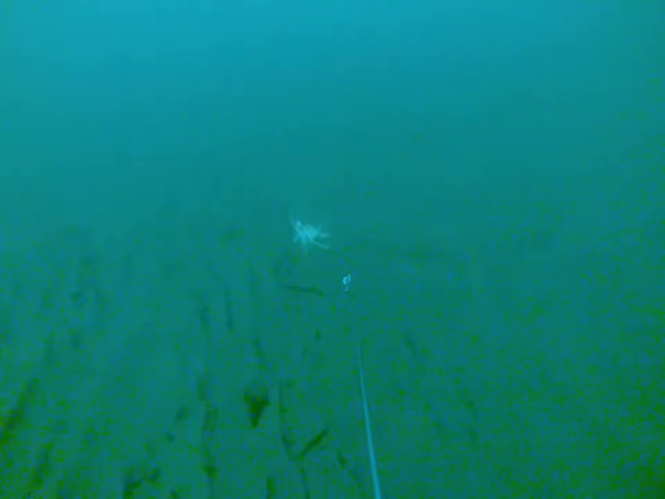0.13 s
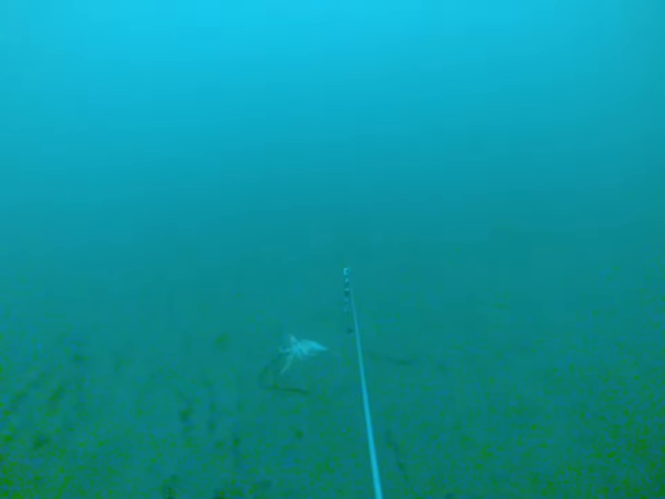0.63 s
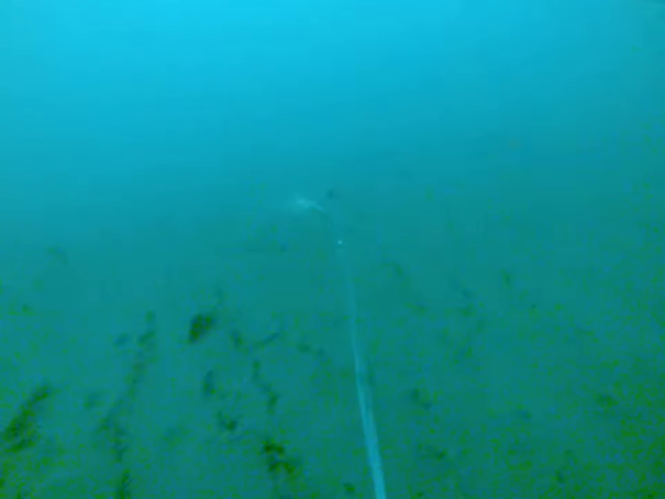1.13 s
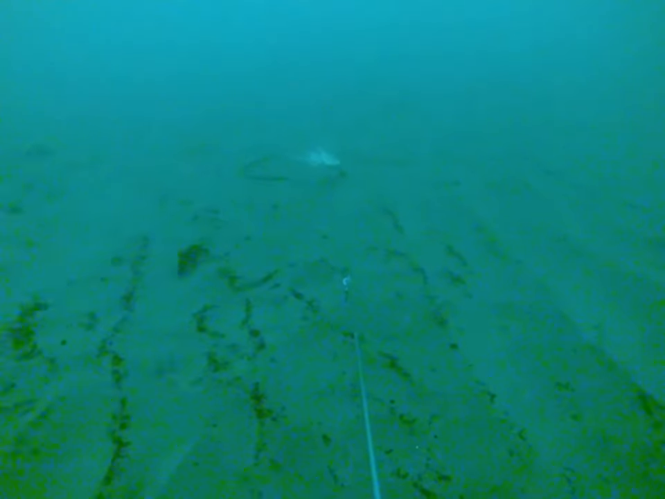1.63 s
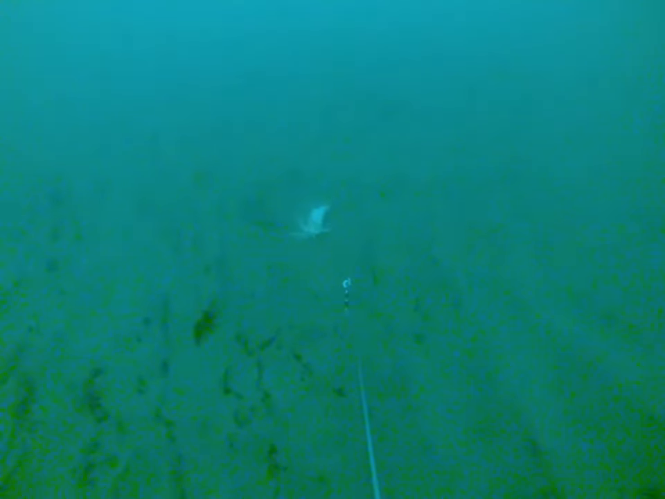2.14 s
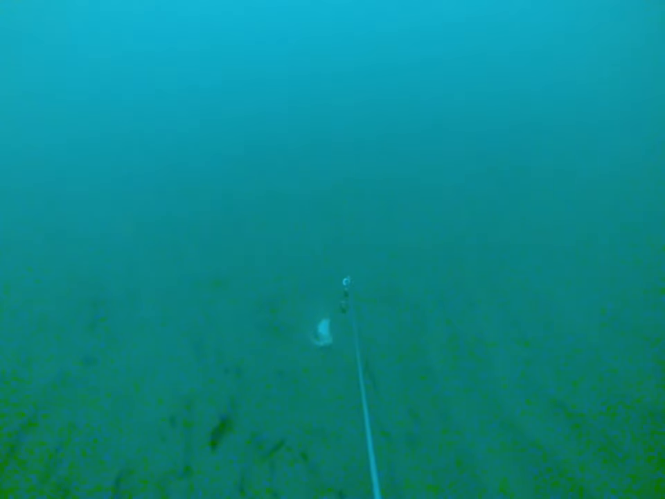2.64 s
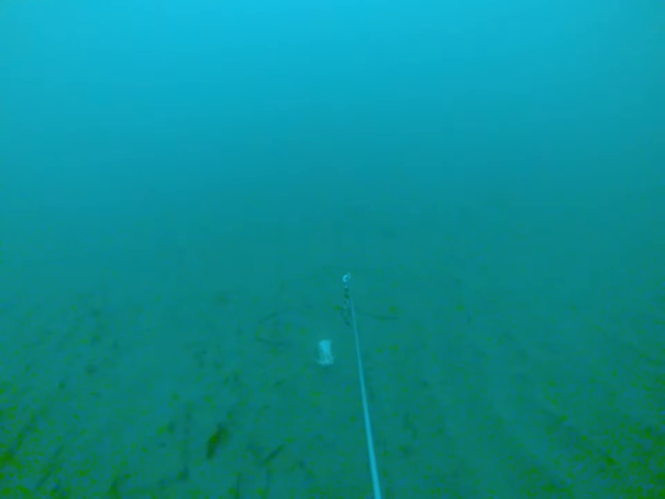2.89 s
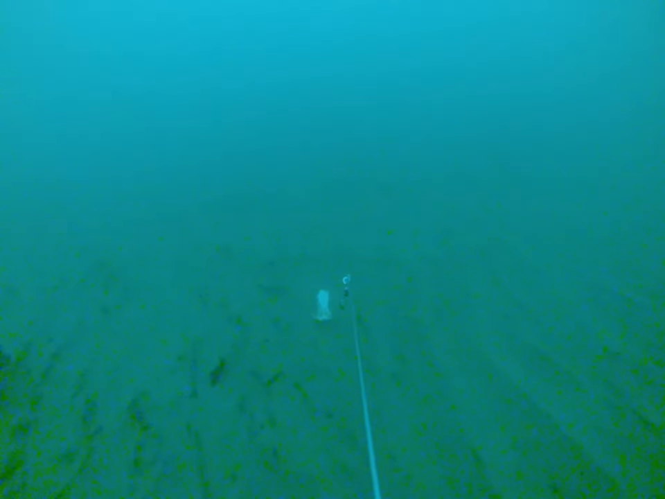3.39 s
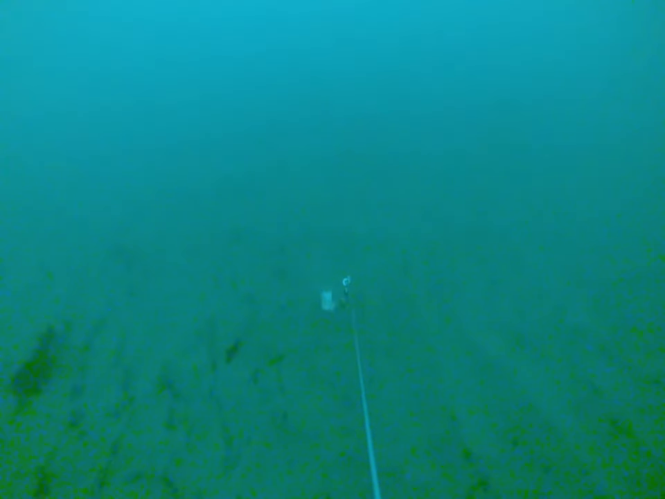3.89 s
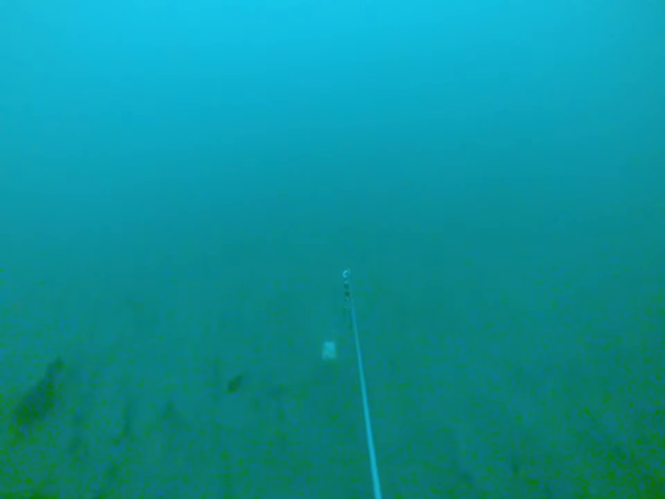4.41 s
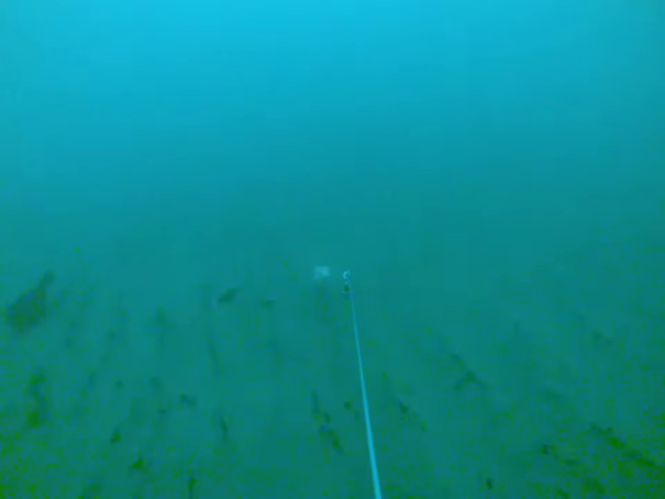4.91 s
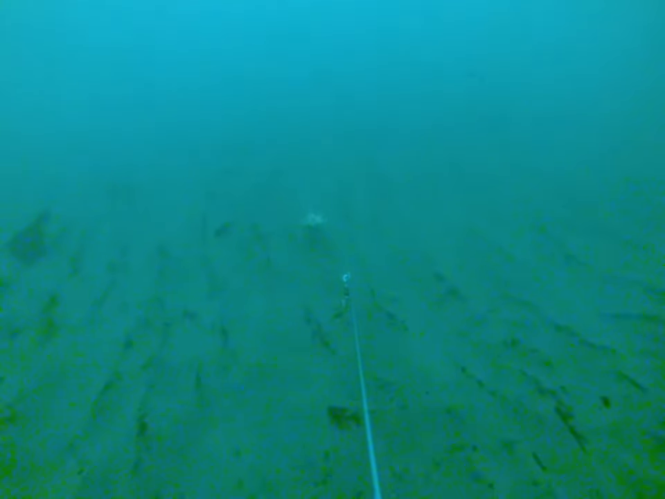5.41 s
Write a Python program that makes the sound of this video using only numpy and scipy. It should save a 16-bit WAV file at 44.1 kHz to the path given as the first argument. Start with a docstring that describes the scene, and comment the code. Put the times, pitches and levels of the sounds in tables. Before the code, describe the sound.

Close, boxy underwater sound of a fishing rig above a sandy bottom. Sharp plastic clicks open it, then scraping and rattling swell into one loud cluster of cracks with a low boom around 0.9 seconds and short ringing metal. The rest is much quieter: scattered taps and scuffs, a weak wavering hum from the line, muffled rumble, constant faint hiss and a delicate timer-like tick.

```python
"""A sealed camera housing hangs on a fishing line under water and hears through its own plastic shell.
From the start broadband noise and low turbulent rumble underlie rubbing, which excites rig and shell
resonances, then line notes (wavering sines), knocks (impulses into damped modes) and faint timed ticks.
Near 0.9 s a strong low note, a surge of flow and the hardest knocks come together; from 1.07 s four blows
leave metal ringing. Afterwards lighter knocks, rubbing and weaker line notes continue to the end."""
import sys
import numpy as np
from scipy import signal
from scipy.fft import rfft, irfft
from scipy.io import wavfile
from scipy.ndimage import uniform_filter1d, minimum_filter1d

SR = 44100
rng = np.random.default_rng(int(sys.argv[2]) if len(sys.argv) > 2 else 0)


def pcm_store(signal):
    """Save signal as 16-bit PCM."""
    levels = np.round(np.clip(np.atleast_2d(signal), -1, 1) * 32767)
    wavfile.write(sys.argv[1], SR, levels.astype(np.int16).T)


def ratio(d):
    """dB to gain"""
    e = np.asarray(d, float) / 20
    return 10 ** e


N = 243873

# Water through the shell and recorder hiss, relative density: (frequency [Hz], density [dB per Hz])
FLOOR_SPECTRUM = [(88, -25), (150, 2.5), (193, -12), (264, -12.5), (866, -22), (1140, -17), (1470, -7.5),
                  (2080, -22.5), (2630, -25), (3070, -19.5), (4280, -30), (4630, -27.5), (5850, -32.5),
                  (13000, -41), (15800, -58)]
# Flow past the housing, before a common trim: (time [s], level [dB])
FLOW_LEVEL = [(0.0, -49.5), (0.15, -39), (0.21, -48), (0.69, -48.5), (1.0, -22.5), (1.12, -43.5),
              (1.35, -34.5), (1.42, -46), (1.49, -43.5), (2.28, -44.5), (2.48, -47), (2.68, -46.5),
              (3.97, -57.5), (4.02, -55.5), (5.53, -53.5)]
# Relative density of the flow rumble: (frequency [Hz], density [dB per Hz])
FLOW_SPECTRUM = [(15, -8.5), (24, -0.5), (31, 4.5), (44, 4.5), (62, -6), (100, -13.5), (200, -25.5),
                 (400, -34), (800, -69)]
# Bouts of tackle rattling and rubbing: (start [s], length [s], shell drive [dB], rig drive [dB])
RUB_BOUTS = [(0, 0.0062, -69, -43.5), (0.08, 0.02, -34.5, -59.5), (0.098, 0.021, -35.5, -35),
             (0.652, 0.078, -26.5, -46), (0.764, 0.082, -27, -50), (0.863, 0.018, -26.5, -24),
             (.92, .03, -25.5, -35), (.985, .04, -21, -40.5), (1.05, .01, -30, -37), (1.13, .035, -37, -41),
             (1.245, 0.077, -35, -42), (1.457, 0.088, -50, -46.5), (1.647, 0.053, -53.5, -54.5),
             (1.845, 0.028, -56, -53), (1.957, .04, -53, -61), (2.1, 0.15, -61.5, -52.5),
             (2.241, 0.093, -33, -43), (2.536, .06, -57.5, -64.5), (2.659, .07, -64.5, -51),
             (2.855, .03, -64, -61.5), (3.18, 0.012, -49.5, -58), (3.268, 0.082, -49.5, -43),
             (3.49, 0.18, -67.5, -60), (3.848, 0.19, -53.5, -52.5), (4.133, 0.037, -50, -61),
             (4.207, 0.029, -56, -71), (4.4, 0.061, -56, -59), (4.525, 0.069, -60.5, -61),
             (5.151, .05, -70.5, -64.5), (5.355, .04, -73.5, -56.5), (5.461, 0.052, -64, -59.5)]
# Slow modes of the rig, mean levels: (frequency [Hz], bandwidth [Hz], level [dB])
RIG_MODES = [(133, 6.6, -0.5), (166.2, 6.3, -2.5), (207.2, 32, -4.5), (273.9, 2.1, -6), (369.5, 25, -8),
             (470, 29, -26), (708, 2.5, -16.5), (665.6, 6.7, -21)]
# Shell modes, undamped by contact: (frequency [Hz], relative level [dB], t60 [s])
SHELL_MODES = [(684, -18.5, 0.17), (695.7, -20.5, 0.62), (980.6, -9, 0.12), (1144, -10, 0.19),
               (1284, -5, 0.19), (1375.4, -4, 0.4), (1473, -1.5, 0.23), (1643, -1.5, 0.16),
               (1806, -2.5, 0.19), (1955, 0, .08), (2154, -19, 0.6), (2379, 0.5, 0.051), (2603, -12, 0.22),
               (2660, -4, 0.048), (2928, -2.5, 0.16), (3103, -0.5, 0.086), (3320, -3, 0.047),
               (3296, -5.5, 0.078), (3432.5, 1, 0.11), (3980, -30, 0.027), (3870, -19.5, 0.14),
               (4130, -14, 0.048), (4537, -6, 0.11), (4646, -3, 0.058), (5150, -18.5, 0.11),
               (6040, -22, 0.081), (6350, -26, 0.098), (6490, -26.5, 0.1), (7640, -33.5, 0.04),
               (8400, -29.5, .04), (8630, -39, 0.0061)]
LOW_UNDER_HZ, HIGH_OVER_HZ = 2060, 4060   # the low and high groups of shell modes
# Notes of the line: (loudest time [s], mean frequency [Hz], rms level at the top [dB], swell [s], fade [s])
LINE_NOTES = [(.08, 133.6, -44, 0.052, 0.13), (.87, 54.5, -14, 0.31, .1), (.9, 162, -40, 0.054, .5),
              (.96, 56.4, -31, .1, .4), (1.06, 167.7, -27.5, .2, 0.071), (1.27, 164.3, -38, 0.12, 0.23),
              (1.29, 86.9, -30.5, .25, 0.2), (1.321, 56.4, -27, 0.19, 0.43), (1.55, 156.3, -50, .2, 0.14),
              (1.56, 54.54, -35, 0.34, 0.38), (2.3, 129.7, -34.5, 0.26, 0.26),
              (3.301, 129.7, -52.5, 0.64, 0.55), (3.65, 124.9, -55.5, .4, .5),
              (4.78, 128.6, -51.5, 0.537, 0.7), (5.1, 122.6, -55.5, 0.31, 1)]
# Tackle knocks, before common trims and scatter:
# (time [s], blow level [dB], low modes re blow [dB], high modes re blow [dB], lasting ring re blow [dB])
SHELL_KNOCKS = [(0.0618, -31, -24, -21.5, 12), (0.0776, -16.5, -28, -7.5, 0.5),
                (0.0867, -10, -29, -15.5, -8.5), (0.1276, -36.5, -38, -16, 3.5),
                (0.174, -30.5, -12, -22, -8), (0.2328, -42, -2.5, -20, -11), (0.3447, -35, -6.5, -15, -17),
                (0.564, -40.5, 0.5, -20, -16), (0.6853, -26.5, 3, -11, -0.5), (0.7135, -16.5, -10, -23, -5),
                (0.8355, -20, 0, -2, -13.5), (0.8698, -12.5, -3, -7.5, -37), (0.8926, 11, -14, -23.5, -41),
                (0.8998, 6.5, -12.5, -9.5, -49), (0.9231, -9, -14, -19, -28),
                (0.9381, -6.5, -9.5, -11.5, -11.5), (1.0156, 2.5, -15, -8, -23),
                (1.0445, -8, 2.5, -14, -20), (1.0702, 3.5, -36, -14.5, -40), (1.1051, -1, -42, -9.5, -32),
                (1.1261, -9.5, -31, -17, -17), (1.1424, -25, -26, -13.5, -3),
                (1.2061, -7.5, -14.5, -16, -1), (1.257, -26.5, -1, -9, -22), (1.294, -18, -17, -26, 0),
                (1.3129, -21, -1, -19, -14), (1.3674, -30, -8.5, -18.5, 0.5),
                (1.3923, -32, -2.5, -18, -10.5), (1.433, -35, -7, -16, -5), (1.4528, -28, -4.5, -19, -2.5),
                (1.5364, -31, 1, -15, -11), (1.6004, -37, -3, -18, -1.5), (1.6288, -36.5, -5, -16, -5),
                (1.705, -33, -3, -19.5, -13.5), (1.7505, -34.5, -7.5, -27, -3.5),
                (1.785, -33, -8, -21, -3.5), (1.928, -27, -12.5, -21.5, -7),
                (2.0158, -36, -7.5, -18.5, -8.5), (2.0893, -28, 9, -42, -21.5),
                (2.1298, -30.5, -6, -23, -6), (2.154, -32.5, -7, -22, -8), (2.1804, -22.5, -6.5, -15, -12),
                (2.196, -22.5, -12, -30, -24), (2.3059, -29, -6.5, -22, -0.5), (2.3292, -20, -11, -13, -7),
                (2.378, -38, 6, -19, -15), (2.4155, -22.5, -9, -23, -21), (2.4913, -40, -10.5, -14, -12.5),
                (2.6503, -29.5, -7, -28.5, -10), (2.6741, -37.5, -2, -23, -8.5),
                (2.7053, -35, -8, -17.5, -15), (2.7455, -38.5, 0.5, -19.5, -17),
                (3.1118, -37.5, -1.5, -27, -15.5), (3.2073, -32.5, 0, -15, -16.5),
                (3.2311, -23.5, -11, -21, -4), (3.2787, -35.5, -8, -36, 6.5),
                (3.3044, -23.5, -5, -22, -12.5), (3.3363, -47, 11, -14, -4),
                (3.3575, -30.5, -18, -20, -24.5), (3.4896, -35, -3.5, -34, -11.5),
                (3.8356, -45, -13.5, -23, -7), (3.8677, -22.5, -18, -27, -18),
                (3.9075, -37.5, -16, -22.5, -24), (3.9634, -38.5, -9.5, -23, -19.5),
                (4.0062, -29, -5.5, -26, -14), (4.0587, -50, -5, -23, -17.5), (4.3809, -34, -7, -20.5, -21),
                (4.4054, -36.5, -6.5, -19, -16.5), (4.586, -44.5, 1.5, -20.5, -12.5),
                (4.7576, -40.5, -5, -22, -13), (4.7715, -35, -7, -14.5, -19), (4.8223, -34, -4, -21, -25),
                (5.226, -29, -4, -15.5, -17), (5.3622, -31, -8, -30, -6), (5.449, -39, -1.5, -18, -24),
                (5.4987, -37, -2, -32, -18)]
# Modes of the electronic tick, before scatter: (frequency [Hz], level re tick [dB], t60 [s])
TICK_MODES = [(1573, -1.5, .02), (3230, -1, 0.007), (4440, -11.5, 0.0098)]
# Indices of the ticks that come one step late
LATE_TICKS = [7, 8, 11, 15, 20]
# Hard blows on a metal part of the tackle, before scatter: (time [s], level [dB])
METAL_BLOWS = [(1.0702, -21), (1.1051, -20), (1.1261, -23), (1.2063, -25)]
# Freely ringing metal modes: (frequency [Hz], level re blow [dB], t60 [s])
METAL_MODES = [(1367, 0, .45), (1745, -7, .25), (2155, -3, .4), (2601, -3, .28), (3021, -1, .25),
               (3480, -4, .16)]


def rms_one(x):
    """Normalisation: scale to rms 1."""
    return x / np.sqrt(np.mean(x ** 2) + 1e-20)


def in_time(rows):
    """Linear interpolation: columns of a time table at every sample."""
    s, *columns = np.transpose(rows)
    return [np.interp(np.arange(N) / SR, s, c) for c in columns]


def drift(rate_hz):
    """Low-pass random process: white noise through two equal poles, rms 1."""
    step_rate = 200   # Hz
    steps = rng.standard_normal(int(N / SR * step_rate) + 400)
    pole = np.exp(-2 * np.pi * rate_hz / step_rate)
    settled = signal.lfilter([1], [1, -2 * pole, pole * pole], steps)[300:]
    slow = rms_one(settled)
    return np.interp(np.arange(N) / SR * step_rate, np.arange(len(slow)), slow)


def coloured_noise(points):
    """Spectral shaping: white noise weighted along log frequency, rms 1."""
    hz, db = np.transpose(points)
    bins_hz = np.arange(N // 2 + 1) * SR / N + 1   # the 1 keeps the logarithm finite
    gain = ratio(np.interp(np.log(bins_hz), np.log(hz), db))
    return rms_one(irfft(rfft(rng.standard_normal(N)) * gain, N))


def ring(force, hz, t60):
    """Damped resonator: a unit click starts a decaying sine of initial height 1."""
    r, w = ratio(-60 / (t60 * SR)), 2 * np.pi * hz / SR
    return signal.lfilter([0, np.sin(w)], [1, -2 * r * np.cos(w), r * r], force + 1e-18)


def band_pass(x, order, low_hz, high_hz):
    """Band limitation: a Butterworth filter passes the range between two corners."""
    return signal.sosfilt(signal.butter(order, [low_hz, high_hz], "band", fs=SR, output="sos"), x)


def muffled(x):
    """Wall transmission: the stiff thick wall passes little outside the range of its modes."""
    return band_pass(x, 4, 620.0, 9150.0)


def snap(contact):
    """Direct contact radiation: the bare contact also reaches the microphone, thin and bright."""
    return band_pass(contact, 2, 7200.0, 12400.0)


def thud(contact):
    """Bulk compliance: the whole housing gives way a little, a short dull push."""
    return band_pass(contact, 2, 260.0, 602.0)


def struck(s, db, modes, spread_db):
    """Modal superposition: each blow excites every mode with a random strength of its own."""
    at = np.round(s * SR).astype(int)
    chance = rng.standard_normal((len(s), len(modes)))
    out = np.zeros(N)
    for k, (hz, level_db, t60) in enumerate(modes):
        strength = ratio(db + level_db + spread_db * chance[:, k])
        out += ring(np.bincount(at, strength, N), hz, t60)
    return out


def background():
    """Stationary broadband noise: water through the shell and recorder hiss, with a slow level drift."""
    return ratio(-59.5 + 1.0 * drift(1.0)) * coloured_noise(FLOOR_SPECTRUM)


def flow():
    """Turbulent pressure fluctuation: lumpy low rumble of eddies on the housing."""
    level_db, = in_time(FLOW_LEVEL)
    trim_db, lump_db = 2.0, 2.0
    return ratio(level_db + trim_db + lump_db * drift(3.3)) * coloured_noise(FLOW_SPECTRUM)


def bouts(level_db, rise_db_per_s, fall_db_per_s, rest_db):
    """Exponential envelopes: each bout rises, holds and falls; gains add to a resting gain, given out in dB."""
    t = np.arange(0, N + 40, 40) / SR   # every 40 samples is enough
    gain = ratio(rest_db)
    for (start, length, *_), db in zip(RUB_BOUTS, level_db):
        before = np.maximum(start - t, 0)
        after = np.maximum(t - start - length, 0)
        gain = gain + ratio(db - rise_db_per_s * before - fall_db_per_s * after)
    return np.interp(np.arange(N) / SR, t, 20 * np.log10(gain))


def rig():
    """Narrow-band random vibration: rubbing shakes a few low modes, each swelling in its own time."""
    rig_db = bouts(np.transpose(RUB_BOUTS)[3], rise_db_per_s=251, fall_db_per_s=137, rest_db=-76)
    out = 0
    for hz, width_hz, level_db in RIG_MODES:
        t60 = np.log(1000) / (np.pi * width_hz)   # decay time from bandwidth
        shaken = ring(rng.standard_normal(N), hz, t60)
        out = out + rms_one(shaken) * ratio(level_db + 2.5 * drift(1.2))
    return ratio(rig_db) * rms_one(out)


def rattle():
    """Random impulse excitation: dense tiny contacts ring the shell, whose modes the touch damps."""
    shell_db = bouts(np.transpose(RUB_BOUTS)[2], rise_db_per_s=294.5, fall_db_per_s=396.5, rest_db=-72)
    densest_per_s, damping = 1200.0, 0.3   # damping multiplies t60
    uneven_db, clump_db, low_db, snap_db = 4.5, 2.0, -4.0, -9.0
    crowd, brighten, snap_growth = 0.3, 0.32, 1.7   # exponents
    below_max_db = shell_db - shell_db.max()

    # light rattling breaks up into separate ticks
    crowding = ratio(crowd * below_max_db)
    sizes = ratio(uneven_db * np.minimum(rng.exponential(1, N), 4)) * rng.choice([-1, 1], N)
    happens = rng.random(N) < densest_per_s * crowding / SR
    touches = sizes * happens / np.sqrt(crowding)
    # three places of contact favour different modes
    place = rng.integers(0, 3, N)
    favour = ratio(0.22 * rng.standard_normal((len(SHELL_MODES), 3)))   # spread in dB

    # the middle modes together set the level
    force = touches * ratio(clump_db * drift(40.0))
    middle = sum(ring(force, hz, damping * t60) * ratio(db) for hz, db, t60 in SHELL_MODES[4:20])
    force = force * ratio(shell_db) / np.sqrt(np.mean(middle ** 2))

    # harder rattling shifts from the low to the high modes
    hard = ratio(brighten * below_max_db)
    # the tackle shifts about on the shell
    shifts = [ratio(2.26 * drift(7.9)) for _ in range(10)]
    out = 0
    for k, (hz, db, t60) in enumerate(SHELL_MODES):
        if hz > HIGH_OVER_HZ:
            tilt = hard
        elif hz < LOW_UNDER_HZ:
            tilt = ratio(low_db) / np.sqrt(hard)
        else:
            tilt = 1
        drive = force * favour[k][place] * shifts[k % len(shifts)] * tilt
        out = out + ring(drive, hz, damping * t60) * ratio(db) * (-1) ** k   # alternate polarity
    return muffled(out) + snap(force * hard ** snap_growth * ratio(snap_db))


def strum(top_s, hz, db, swell_s, fade_s):
    """Transverse string vibration: the taut line swings as a near sine that wavers, swells and fades."""
    span_db = 30        # fall at one swell time before the top or one fade time after it
    swell_power = 1.2   # above 1 the swell rounds off towards its top
    waver = 0.0065      # rms fraction of the frequency
    t = np.arange(N) / SR - top_s
    heard = (t > -2 * swell_s) & (t < 2 * fade_s)
    before = np.maximum(-t[heard], 0) / swell_s
    after = np.maximum(t[heard], 0) / fade_s
    under_db = span_db * (before ** swell_power + after)
    phase = 2 * np.pi * np.cumsum(hz * (1 + waver * drift(6.7)[heard])) / SR
    out = np.zeros(N)
    out[heard] = np.sqrt(2) * ratio(db - under_db) * np.sin(phase)
    return out


def knocks():
    """Impact excitation: clicks and scuffs ring modes briefly while the tackle touches; another ring lasts."""
    coupling_db, low_db, high_db, spread_db = -7.5, 3.5, 13.5, 3.5
    held, lasting = 0.14, 0.33   # factors on the shell t60
    scuff, scuff_ms = 0.19, 2.3
    rebound, rebounds_per_ms, rebound_ms = 0.8, 0.28, 6.7
    chatter, chatter_ms, clear_db = 2.16, 11.4, -18.5
    snap_power, snap_db, thud_db = 3.4, -19.5, -8.0
    s, blow_db, low, high, lasting_db = np.transpose(SHELL_KNOCKS)
    ms = np.arange(1300) / SR * 1000

    # one row of chance per knock: contact noise, then mode strengths of the brief and the lasting ring
    chance = rng.standard_normal((len(s), len(ms) + 2 * len(SHELL_MODES)))
    noise, brief_chance, lasting_chance = np.split(chance, [len(ms), len(ms) + len(SHELL_MODES)], axis=1)

    # a unit click with a scuff behind it
    phase = ms / scuff_ms
    contact = scuff * noise * np.exp(-phase) * (1 - np.exp(-6.0 * phase))
    contact[:, 0] += 1
    # a few uneven rebounds follow within some milliseconds
    rebounds = rng.random(noise.shape) < rebounds_per_ms * 1000 / SR
    contact += rebounds * noise * rebound * np.exp(-ms / rebound_ms)
    contact /= np.sqrt(np.sum(contact ** 2, axis=1, keepdims=True))

    # a light knock keeps chattering, so its lasting ring is rough; a hard one springs clear
    grit = noise[:, ::-1] ** 3 * np.exp(-ms / chatter_ms)
    grit /= np.sqrt(np.sum(grit ** 2, axis=1, keepdims=True))
    rough = contact + grit * chatter / (1 + ratio(blow_db[:, None] - clear_db))

    starts = np.round(s * SR).astype(int)[:, None]
    at = np.minimum(starts + np.arange(len(ms)), N - 1).ravel()

    def placed(db, push):
        """Superposition: sum the contact forces at their times."""
        return np.bincount(at, (ratio(db)[:, None] * push).ravel(), N)

    out = np.zeros(N)
    for k, (hz, level_db, t60) in enumerate(SHELL_MODES):
        if hz < LOW_UNDER_HZ:
            group_db = low + low_db
        elif hz > HIGH_OVER_HZ:
            group_db = high + high_db
        else:
            group_db = 0
        mode_db = blow_db + group_db + level_db + coupling_db
        brief_db = mode_db + spread_db * brief_chance[:, k]
        long_db = mode_db + lasting_db + spread_db * lasting_chance[:, k]
        brief_ring = ring(placed(brief_db, contact), hz, held * t60)
        long_ring = ring(placed(long_db, rough), hz, lasting * t60)
        out += (brief_ring + long_ring) * (-1) ** k   # alternate polarity

    # harder knocks snap more than in proportion
    bare = placed(snap_power * blow_db + high + snap_db, contact)
    shove = placed(blow_db + low + thud_db, rough)
    return muffled(out) + snap(bare) + thud(shove)


def ticks():
    """Periodic impulse excitation: the camera's electronics tick on a timer, three dulled rings and a snap."""
    first_s, every_s, late_s = 0.1433, 0.22, 0.005
    s = np.arange(first_s, N / SR - late_s, every_s)
    s[LATE_TICKS] += late_s
    dull = signal.butter(2, 5200.0, fs=SR, output="sos")   # low-pass, Hz
    rings = signal.sosfilt(dull, struck(s, -41, TICK_MODES, spread_db=2.0))
    snap_gain = ratio(-46.5 + 2.5 * rng.standard_normal(len(s)))
    clicks = np.bincount(np.round(s * SR).astype(int), snap_gain, N)
    return rings + snap(clicks)


def metal():
    """Free modal decay: hard blows leave a metal part of the tackle ringing, heard through the wall."""
    return muffled(struck(*np.transpose(METAL_BLOWS), METAL_MODES, spread_db=3.5))


def scene():
    """Linear superposition: all sources sum at one microphone inside the shell."""
    line = sum(strum(*note) for note in LINE_NOTES)
    ringing_metal = metal()
    floor = background()
    mix = knocks() + ringing_metal + rattle() + rig() + line + flow() + floor + ticks()
    return mix[None]


def top_cut(x):
    """Nothing passes above the cut-off."""
    return signal.sosfilt(signal.butter(12, 16180, fs=SR, output="sos"), x)


def record(dry):
    """Peak limitation: a fast smoothed gain holds the hardest knocks down near the ceiling."""
    ceiling, limit_ms = 0.99, 1.5
    span = int(limit_ms * SR / 1000)
    room = minimum_filter1d(ceiling / np.maximum(np.abs(dry), ceiling), size=span)
    finished = dry * uniform_filter1d(room, size=span)
    return top_cut(finished)


dry = scene()
out = record(dry)
pcm_store(out)
```